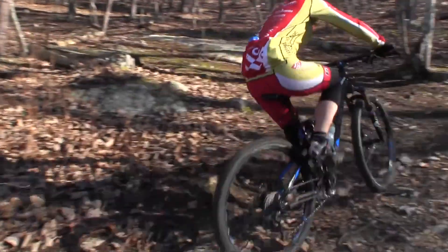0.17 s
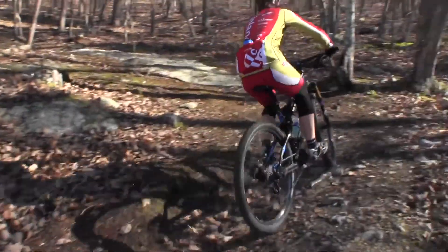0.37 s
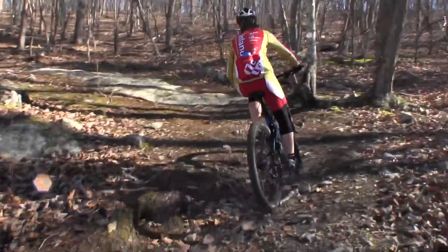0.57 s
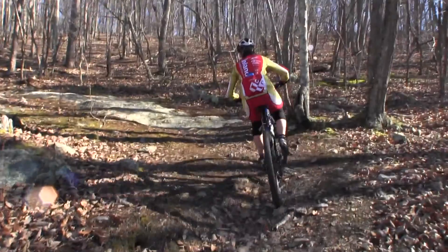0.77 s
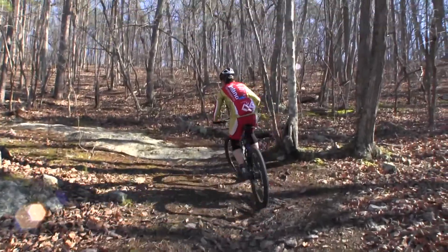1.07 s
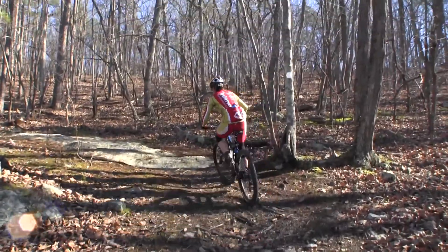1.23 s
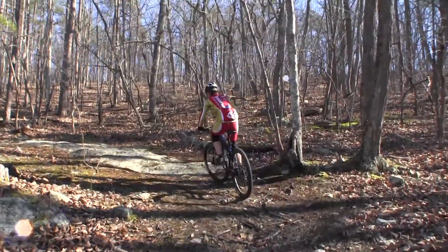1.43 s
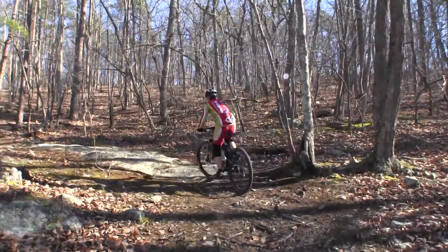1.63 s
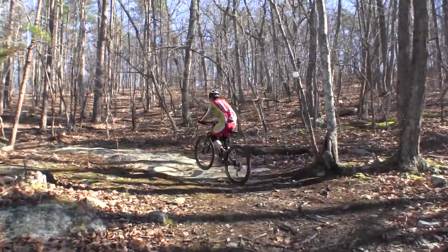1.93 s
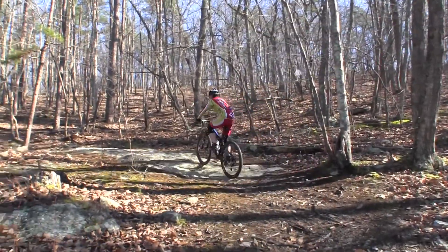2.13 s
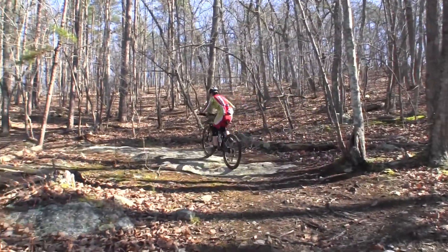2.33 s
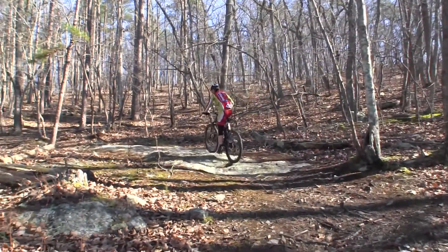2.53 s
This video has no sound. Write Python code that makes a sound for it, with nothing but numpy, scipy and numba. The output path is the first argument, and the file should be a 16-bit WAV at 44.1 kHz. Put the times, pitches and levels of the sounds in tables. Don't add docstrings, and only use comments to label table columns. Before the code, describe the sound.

Bicycle tyres crush dry leaves in a loud, bright crackle right beside the microphone, then fade away over soil with snapping twigs, ticking stalks and soft root thumps, in a quiet, faintly breezy wood.

```python
import sys
import numpy as np
from scipy import signal
from scipy.fft import rfft, irfft, next_fast_len
from scipy.io import wavfile
from scipy.ndimage import uniform_filter1d
from numba import njit

SR = 44100
rng = np.random.default_rng(int(sys.argv[2]) if len(sys.argv) > 2 else 0)


def int16_out(signal):
    q = np.round(np.clip(np.atleast_2d(signal).T, -1, 1) * 32767)
    wavfile.write(sys.argv[1], SR, q.astype(np.int16))


def invert_db(x):
    u = np.asarray(x, float) / 20
    return 10 ** u


N = 119070
TIME_S = np.arange(N) / SR


def unit(x):
    return x / np.sqrt(np.mean(x ** 2))


def read(table, hz):
    points = np.array(table, float)
    return np.interp(np.log(np.maximum(hz, 1)), np.log(points[:, 0]), points[:, 1])


def colour(x, gain):
    size = next_fast_len(N + 4096)
    hz = np.arange(size // 2 + 1) * SR / size
    return irfft(rfft(x, size) * gain(hz), size)[..., :N]


def noise(table):
    return colour(rng.standard_normal(N), lambda f: invert_db(read(table, f)))


def walk(rate_hz):
    hold = int(SR / rate_hz)
    steps = np.repeat(rng.standard_normal(400), hold)[:N + hold]
    return unit(uniform_filter1d(uniform_filter1d(steps, hold), hold)[:N])


@njit
def grains(start_s, hz, cycles, gain, pan, rate, size):
    out = np.zeros((2, size))
    for k in range(len(start_s)):
        turn = np.exp((2j * np.pi - 2.3 / cycles[k]) * hz[k] / rate)
        swell = np.exp(-3 * hz[k] / rate)
        z, unswelled, i = 1. + 0j, 1., int(start_s[k] * rate)
        while z.real * z.real + z.imag * z.imag > 2e-4 and i < size:
            sample = gain[k] * (1 - unswelled) * z.imag
            out[0, i] += (1 + pan[k]) * sample
            out[1, i] += (1 - pan[k]) * sample
            z, unswelled, i = z * turn, unswelled * swell, i + 1
    return out


def crackle(per_s, lo_hz, hi_hz, cycles, spread_db, table):
    gap, pitch, size, side, length = rng.random((5, 20000))
    start_s = np.cumsum(-np.log(1 - gap)) / per_s
    hz = lo_hz * (hi_hz / lo_hz) ** pitch
    gain = invert_db(spread_db * np.minimum(-np.log(1 - size), 2.8)) * hz * np.sign(side - .5)
    pan = 0.04 * (2 * side % 1 * 2 - 1)
    rain = grains(start_s, hz, cycles * (.5 + length), gain, pan, 1. * SR, N)
    return unit(colour(rain, lambda f: invert_db(read(table, f))))


def rings(start_s, hz, cycles, gain):
    start_s, hz, gain = start_s.ravel(), hz.ravel(), gain.ravel()
    still = np.zeros(len(start_s))
    return grains(start_s, hz, still + cycles, gain, still, 1. * SR, N)


def breaks(rows, cycles, gain_db, bright_db, parts, spread_s, spread_oct, fall_db, top_hz):
    s, db, hz = np.array(rows, float).T
    s = s + .0008

    def ring(at, pitch, gain):
        return rings(at, np.minimum(pitch, top_hz), cycles, gain)

    main = ring(s, hz, invert_db(db + gain_db))
    edge = ring(s + 0.00019, 1.62 * hz, -invert_db(db + bright_db))
    edge = edge + ring(s + 0.00045, 2.7 * hz, invert_db(db + bright_db - 0.5))
    late, step, sign = rng.random((3, len(s), parts))
    late, step, sign = .1 + late, 2 * step - .6, np.sign(sign - .5)
    splinter_hz = hz[:, None] * 2 ** (spread_oct * step)
    splinter_gain = sign * invert_db(db[:, None] - fall_db - 6.3 * late)
    return main + edge + ring(s[:, None] + spread_s * late, splinter_hz, splinter_gain)


def knocks(rows, cycles):
    s, db, hz = np.array(rows, float).T
    return uniform_filter1d(rings(s, hz, cycles, invert_db(db + 2.0)), int(0.002 * SR), axis=1)


# start_s, leaf_db, tread_db
PASS_BY = [(0, -24.5, -40), (.13, -28, -40), (.25, -35.5, -39), (0.448, -39, -44), (.55, -41, -40.5),
           (.8, -40, -44), (.9, -48, -40.5), (1.18, -51, -48.5), (1.34, -54, -46), (1.47, -59.5, -56),
           (1.6, -50.5, -48.5), (1.86, -56, -47), (2.05, -54, -51), (2.3, -57.5, -48), (2.55, -60, -58),
           (2.7, -66, -62)]
# centre_s, half_length_s, extra_db, tread_share (ratio)
LITTER = [(0.081, 0.019, 5, 0.74), (0.146, 0.007, -0.5, 0.8), (0.365, 0.065, 2, 3.94),
          (0.399, 0.005, 5.5, 1.2), (0.632, 0.017, 7.5, 0.3), (0.691, 0.0094, -9.5, 1),
          (0.764, 0.022, 6.5, 0.75), (0.828, 0.02, 5, 1), (0.987, 0.055, 4, 0.85), (1.101, 0.018, 9, 0.43),
          (1.208, 0.015, 9.5, 0.3), (1.265, 0.014, 9, 0.5), (1.299, 0.0084, 13, 0.42),
          (1.4, 0.0068, 6, 0.45), (1.687, 0.041, 3.5, 1), (1.786, .008, 13, 0.03), (1.817, 0.031, 1.5, 2.5),
          (2.021, 0.029, 11, 0.34), (2.079, 0.031, 3, 2.5), (2.14, 0.017, -4.5, 2),
          (2.218, 0.011, 10.5, 0.5), (2.373, 0.0095, 1, 2.4), (2.627, 0.03, 2, 7), (2.508, 0.01, 3, 4),
          (0.59, 0.0088, 2, .6), (0.697, 0.0094, 3, 0.1)]


def ground():
    s, leaf_db, tread_db = np.array(PASS_BY, float).T
    leaf, tread = np.interp(TIME_S, s, leaf_db), np.interp(TIME_S, s, tread_db)
    for centre_s, half_s, extra_db, tread_share in LITTER:
        bump = extra_db * np.exp(-((TIME_S - centre_s) / half_s) ** 2)
        leaf, tread = leaf + bump, tread + tread_share * bump
    return leaf, tread


# pitch_hz, level_db (per Hz)
LEAF_TONE = [(530, -38), (900, -0.5), (1710, 5.5), (2900, 2), (3550, 8), (4620, 4), (7000, 5.5), (8800, 1),
             (11200, 4), (15600, -11)]


def leaves(level_db, bounce):
    crush = crackle(5000, 980, 15650, cycles=1.8, spread_db=2, table=LEAF_TONE)
    crush = crush + invert_db(-4.5) * unit(noise(LEAF_TONE))
    flicker_db = 2 * (bounce + walk(70)) / 2
    return crush * invert_db(level_db + flicker_db)


# pitch_hz, level_db (per Hz)
TREAD_TONE = [(80, -10), (200, -13), (290, -9.5), (400, -8.5), (800, -9.5), (1180, -4), (1550, -15),
              (2000, -11), (4500, -25.5)]


def tread(level_db, bounce):
    grind = crackle(2500, 78.7, 6140, cycles=2.18, spread_db=2.5, table=TREAD_TONE)
    cavity_hz, cavity_width_hz = 288, 19
    hum = unit(colour(grind.mean(0), lambda f: 1 / (1 + 2j * (f - cavity_hz) / cavity_width_hz)))
    side_on_db = -7 * np.exp(-(TIME_S / 0.13) ** 2)
    hum = hum * invert_db(-17.5 + 4.5 * walk(8.1) + side_on_db)
    flicker_db = 2.2 * (bounce + walk(29.7)) / 2
    return (grind + hum) * invert_db(level_db + 3.0 + flicker_db)


def tyres():
    leaf_db, tread_db = ground()
    bounce = walk(46.22)
    return leaves(leaf_db, bounce) + tread(tread_db, bounce)


# pitch_hz, level_db (per Hz)
WOOD_TONE = [(15, -39), (25, -4), (274, 5.5), (433, -4.5), (1140, -1.5), (1570, -12), (1950, -2.5),
             (6000, -17.5), (10600, -29.5), (15500, -27)]


def wood():
    mid, side = noise(WOOD_TONE), noise(WOOD_TONE)
    side = colour(side, lambda f: 0.3 + 0.21 / (1 + (f / 110) ** 2))
    return invert_db(-52.5 + walk(2.74)) * unit(mid + side * np.array([[1], [-1]]))


def wind():
    x = rng.standard_normal((3, N))
    wind_hz = 73.5
    air = colour(x[:2] + 0.98 * x[2], lambda f: (f / wind_hz) ** 1.6 / (1 + (f / wind_hz) ** 5.9))
    level_db = -65 + 1.5 * TIME_S
    return unit(air) * invert_db(level_db + 1.2 * walk(4.1))


# start_s, level_db (peak), pitch_hz
LEAF_CRACKS = [(0.0122, -5.5, 9400), (0.0725, -1, 5840), (0.0893, -4, 8700), (0.0985, -2.5, 6760),
               (0.1014, -7, 8030), (0.0615, -12, 3970), (0.1245, -11, 8800), (0.1414, -7.5, 10300),
               (0.1485, -7, 8300), (0.151, -13, 6560), (0.1584, -10, 8470), (0.3082, -13, 7100),
               (0.4512, -16, 7600), (0.645, -20, 5540), (0.7881, -15.5, 7300), (0.826, -19.5, 7260),
               (0.9381, -27, 10400), (0.976, -24.5, 7150), (0.998, -27, 5550), (1.1545, -19, 5300),
               (1.6225, -29.5, 5000), (1.739, -30.5, 4500), (1.7825, -32, 4650), (1.91, -36, 5000),
               (2.0093, -31, 6850), (2.0727, -25, 8100), (2.1012, -33, 5730), (2.22, -28.5, 6700),
               (2.254, -29, 6200), (2.5514, -30.5, 4600)]


def cracks():
    return breaks(LEAF_CRACKS, cycles=6.4, gain_db=0.0, bright_db=-5, parts=7, spread_s=0.002,
                  spread_oct=0.46, fall_db=4, top_hz=11400)


# start_s, level_db (peak), pitch_hz
WHEEL_DROPS = [
    (.06, -40, 95),
    (0.549, -32, 85),
    (0.641, -34, 75),
    (.77, -33, 91),
    (0.819, -35, 101),
    (0.939, -32.5, 139),
    (1.06, -45, 85),
    (1.44, -38, 80.5),
    (1.819, -39, 152),
    (2.1, -38, 102),
]


def jolts():
    return knocks(WHEEL_DROPS, cycles=3.6)


# start_s, level_db (peak), pitch_hz
TWIG_SNAPS = [(0.157, -12, 1860), (0.176, -18, 3410), (0.295, -8, 1580), (0.3385, -11, 1390),
              (0.3985, -6, 1270), (0.4032, -11.5, 2300), (0.465, -9.5, 1410), (0.563, -17.5, 1250),
              (0.642, -20, 1240), (0.721, -20, 1110), (0.824, -20, 1210), (0.975, -10.5, 1330),
              (1.082, -18, 760), (1.155, -17.5, 2210), (1.216, -21.5, 870), (1.222, -20.5, 2170),
              (1.259, -20.5, 880), (1.299, -35, 1020), (1.526, -28.5, 1160), (1.6595, -25, 2550),
              (1.683, -21, 1190), (1.706, -9, 2000), (1.911, -28, 1270), (1.96, -31, 1060),
              (2.068, -21, 1050), (2.089, -23.5, 1260), (2.19, -29.5, 700), (2.288, -25, 1760),
              (2.371, -24.5, 1060), (2.476, -29, 1070)]


def twigs():
    return breaks(TWIG_SNAPS, cycles=2.21, gain_db=4.0, bright_db=-5.5, parts=6, spread_s=.008,
                  spread_oct=0.64, fall_db=9.5, top_hz=3300)


# start_s, level_db (peak), pitch_hz
ROOT_THUMPS = [(0.205, -25.5, 295), (0.34, -32, 201), (0.346, -23.5, 265), (0.396, -17, 410),
               (0.47, -34.5, 286), (0.598, -25.5, 288), (0.643, -29, 235), (0.76, -27, 257),
               (0.796, -24, 267), (0.836, -26.5, 294), (0.917, -18, 304), (1.02, -26.5, 310),
               (1.086, -41, 229), (1.27, -30, 289), (1.335, -32, 285), (1.385, -39, 288),
               (1.409, -30.5, 288), (1.43, -36, 290), (1.681, -30.5, 250), (1.775, -32.5, 250),
               (1.8, -28.5, 302), (1.85, -35, 285), (2.002, -33, 288), (2.07, -32.5, 276), (2.19, -32, 300),
               (2.229, -35, 325), (2.28, -39, 278)]


def thumps():
    return knocks(ROOT_THUMPS, cycles=5.7)


# start_s, level_db (peak), pitch_hz
STALK_TICKS = [(.2547, -25, 3280), (.2731, -23, 1620), (.2945, -13.5, 3030), (.49, -23, 3800),
               (.579, -20.5, 1470), (.59, -21.5, 3600), (.6432, -21.5, 3670), (.715, -24, 5500),
               (.9421, -28, 1820), (.9755, -38, 3930), (.9985, -27.5, 3180), (1.0818, -23, 1820),
               (1.1545, -27, 3260), (1.2147, -21, 3170), (1.2235, -22, 3080), (1.5472, -34, 2330),
               (1.5612, -29.5, 2620), (1.5901, -37, 3110), (1.6061, -33, 3070), (1.675, -33, 3800),
               (1.7562, -31, 1860), (1.868, -33.5, 2180), (1.9608, -32, 1980), (2.1648, -49, 2000),
               (2.1908, -35, 1850), (2.2192, -32.5, 1930), (2.2541, -32.5, 2980), (2.4751, -33, 2220),
               (2.518, -41, 1900), (2.5928, -39.5, 950)]


def stalks():
    return breaks(STALK_TICKS, cycles=2.45, gain_db=6.0, bright_db=-12, parts=3, spread_s=0.00295,
                  spread_oct=0.22, fall_db=-7, top_hz=5000)


def scatter(bike):
    t = np.arange(4410) / SR
    tail = rng.standard_normal((2, 4410)) * invert_db(-60 * t / 0.082) * (t > .002)
    tail = 0.65 * tail[0] + 0.36 * tail
    tail = tail / np.sqrt(np.sum(tail ** 2) / 2)
    return invert_db(-12.5) * signal.fftconvolve(bike, tail, axes=1)[:, :N]


def scene():
    bike = tyres() + cracks() + jolts() + twigs() + thumps() + stalks()
    bike = colour(bike, lambda f: (1j * f / (1j * f + 70)) ** 2)
    return bike + scatter(bike) + wood() + wind()


# pitch_hz, left_minus_right_db
PORT_LEVEL = [(60, 2), (300, 1), (700, 0.4), (2400, -1.3), (4400, 0), (8100, -2), (11000, -2.5), (14000, 0)]
# pitch_hz, left_lead_rad
PORT_PHASE = [(0, 0), (860, -0.23), (1460, 0.033), (3000, 0.045), (5770, -0.33), (9500, -0.063),
              (15300, -0.1)]


def ports(x):
    sides = np.array([[.5], [-.5]])

    def response(f):
        level = invert_db(sides * read(PORT_LEVEL, f))
        phase = np.exp(1j * sides * read(PORT_PHASE, f))
        return level * phase * (f > 20) / (1 + (f / 15780) ** 400)

    return colour(x, response)


def top_cut(x):
    return signal.sosfilt(signal.butter(12, 15740, fs=SR, output="sos"), x)


def record(dry):
    mix = ports(dry)
    return top_cut(mix)


dry = scene()
out = record(dry)
int16_out(out)
```